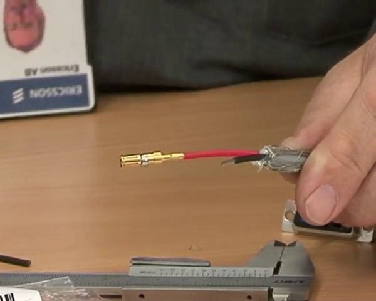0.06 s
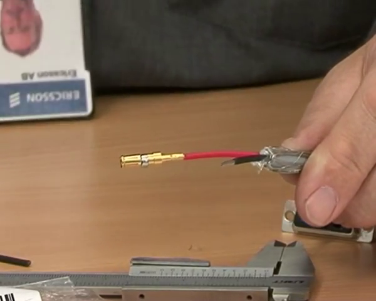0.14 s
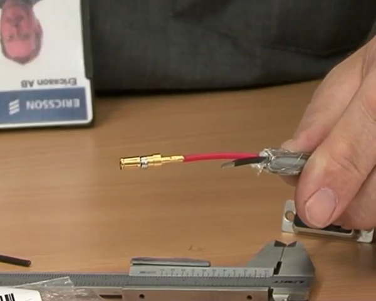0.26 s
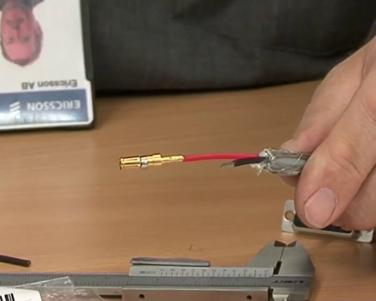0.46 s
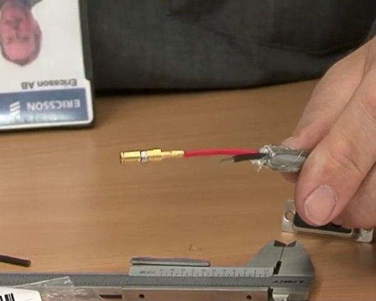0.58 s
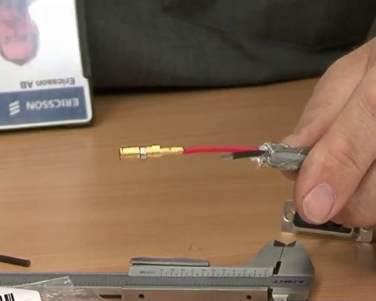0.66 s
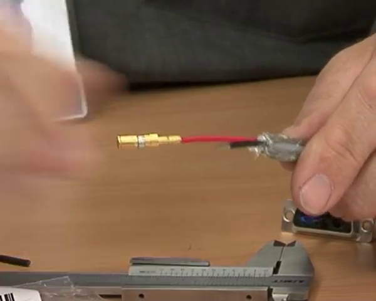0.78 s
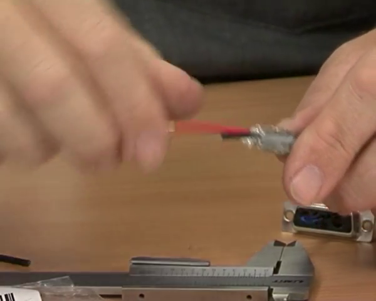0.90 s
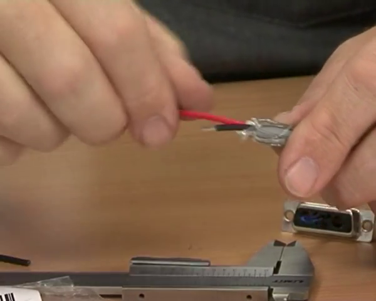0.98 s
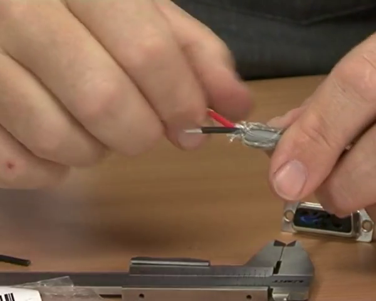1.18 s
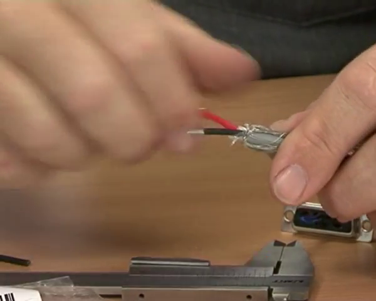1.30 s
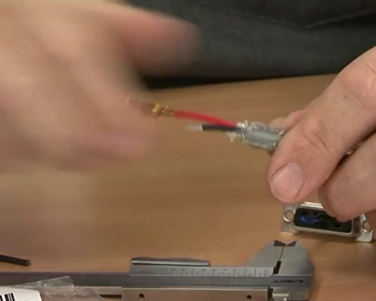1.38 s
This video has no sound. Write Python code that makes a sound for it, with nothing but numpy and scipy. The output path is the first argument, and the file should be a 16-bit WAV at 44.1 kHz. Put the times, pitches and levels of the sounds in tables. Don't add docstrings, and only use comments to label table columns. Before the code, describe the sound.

A steel hand tool knocks down on a wooden table, bounces, knocks again, then plastic rubbing

```python
import sys
import numpy as np
from scipy import signal
from scipy.io import wavfile

SR = 44100
rng = np.random.default_rng(int(sys.argv[2]) if len(sys.argv) > 2 else 0)


def store_pcm(level_fs):
    pcm = np.round(np.clip(level_fs, -1, 1) * 32767).astype(np.int16)
    wavfile.write(sys.argv[1], SR, np.atleast_2d(pcm).T)


def how_loud(loudness_db):
    steps = np.asarray(loudness_db, float) / 20
    return 10 ** steps


N = 63945
T = np.arange(N) / SR


def rms_one(x):
    return x / np.sqrt(np.mean(x ** 2) + 1e-20)


def in_time(rows, column=1):
    rows = np.array(rows)
    return how_loud(np.interp(T, rows[:, 0], rows[:, column], right=-99))


def at_hz(points, hz):
    points = np.array(points)
    return np.interp(np.log(hz), np.log(points[:, 0]), points[:, 1])


def drift(rate_hz):
    r = np.exp(-2 * np.pi * rate_hz / SR)
    white = rng.standard_normal(N + SR)
    return rms_one(signal.lfilter([1], [1, -2 * r, r * r], white)[SR:])


def ring(clicks, hz, t60_s):
    r, w = how_loud(-60 / (t60_s * SR)), 2 * np.pi * hz / SR
    return signal.lfilter([0, np.sin(w)], [1, -2 * r * np.cos(w), r * r], clicks + 1e-18)


def click(s, db):
    out = np.zeros(N)
    out[min(int(s * SR), N - 1)] = how_loud(db)
    return out


def butter(x, order, hz, kind):
    return signal.sosfilt(signal.butter(order, hz, kind, fs=SR, output="sos"), x)


def soft(x, hz):
    return butter(x, 2, hz, "low")


def bands(length):
    edges = 22 * 2 ** np.arange(0, 9.3, 1 / 3)
    white = rng.standard_normal((2, length + 8000))
    out = []
    for k, (low, high) in enumerate(zip(edges, edges[1:])):
        noise = butter(white[k % 2], 2, [low, high], "band")[8000:]
        out.append((np.sqrt(low * high), noise))
    return out


def grains(per_s, spread_db):
    size = how_loud(spread_db * np.minimum(rng.exponential(1, N), 4)) * rng.choice([-1, 1], N)
    return size * (rng.random(N) < per_s / SR)


# start in seconds, level in dB, crack in dB, crack length in seconds, table thump in dB.
BLOWS = [
    (0.2388, -6, -40, 0.0013, -16),
    (0.2801, -6.5, -24.5, 0.00062, -24),
    (0.5112, -3, -29, 0.0014, -19),
]
# frequency in Hz, level in dB, t60 in seconds.
FIRST_MODES = [(433.6, 3.5, 0.061), (589, -5, 0.062), (138, -7, 0.033), (823, -7, 0.038),
               (1300, -24, 0.018)]
BOUNCE_MODES = [(771, 1.5, 0.037), (309.3, -6, 0.1), (438, -14, 0.094), (1278, -5, 0.024),
                (1813, -10, 0.039), (2382, -4.5, 0.0097), (622, -9, 0.034)]
SECOND_MODES = [(814, 0, 0.032), (331, -5.5, 0.048), (1643, -11, 0.025), (1232, -12.5, 0.036),
                (2430, -21, 0.016), (946, -8.5, 0.018)]


def knocks():
    out = np.zeros(N)
    for (s, db, crack_db, crack_s, _), modes in zip(BLOWS, (FIRST_MODES, BOUNCE_MODES, SECOND_MODES)):
        tones = np.zeros(N)
        for k, (hz, mode_db, t60_s) in enumerate(modes):
            tones += (-1) ** (k + 1) * ring(click(s, db + mode_db), hz, t60_s)
        u = np.maximum(T - s, 0) / crack_s
        out += soft(tones, 4900) + how_loud(crack_db) * rng.standard_normal(N) * u * np.exp(1 - u)
    return out


# frequency in Hz, level in dB, t60 in seconds.
TABLE_MODES = [(74, -5, 0.038), (96.2, -3, 0.22), (142.6, -3.5, 0.16), (163.5, -7, 0.45),
               (217.9, -3.5, 0.42), (255.4, -4, 0.55)]


def table_thumps():
    legs_hz, legs_lag_s, legs_t60_s, legs_db = 56.8, 0.029, 0.21, -9.5
    out = np.zeros(N)
    for s, _, _, _, thump_db in BLOWS:
        out += soft(sum(ring(click(s, thump_db + db), hz, t60_s) for hz, db, t60_s in TABLE_MODES), 190)
        u = np.maximum(T - s - legs_lag_s, 0)
        swell = u / legs_t60_s * 20 * how_loud(-60 * u / legs_t60_s)
        out += how_loud(thump_db + legs_db) * np.sin(2 * np.pi * legs_hz * u) * swell
    return out


# frequency in Hz, level in dB, t60 in seconds.
PANEL_MODES = [(331.2, -10.5, 0.26), (398.4, -8, 0.33), (500, -10, 0.37), (646, -11, 0.31),
               (735, -19, 0.38), (797, -16.5, 0.45), (970, -13, 0.35), (1061, -17.5, 0.5)]
PANEL_DRIVE_DB = [-25, -23, -17.5]


def panel_ringing():
    out = np.zeros(N)
    for (s, *_), drive_db in zip(BLOWS, PANEL_DRIVE_DB):
        for k, (hz, db, t60_s) in enumerate(PANEL_MODES):
            out += (-1) ** k * ring(click(s, drive_db + db), hz, t60_s)
    return out


# level in dB, rise in seconds, t60 in seconds, top frequency in Hz.
RATTLES = [
    (-24.5, 0.0087, 0.3, 1720),
    (-27.5, 0.00067, 0.19, 2420),
    (-22.5, 0.005, 0.33, 1170),
]


def rattles():
    bright_db, ring_db = -29, -14.5
    out = np.zeros(N)
    for (s, *_), (db, rise_s, t60_s, top_hz) in zip(BLOWS, RATTLES):
        taps = butter(grains(6000, 3.05), 1, 250, "high")
        loose = rms_one(soft(taps, top_hz))
        loose += how_loud(bright_db) * rms_one(soft(taps, 8600))
        loose += how_loud(ring_db) * rms_one(ring(taps, 2000, 0.0095))
        u = np.maximum(T - s, 0)
        out += how_loud(db - 60 * u / t60_s) * (1 - np.exp(-u / rise_s)) * loose
    return out


# start in seconds, level in dB, tilt in dB per octave.
JINGLES = [(0.254, -39, -1), (.265, -38.5, -1), (0.283, -35.5, -13), (0.297, -38, -16), (0.308, -44, -10),
           (.521, -43, -5), (0.533, -37, -8), (.541, -41, -3), (0.566, -45, -9), (.576, -46.5, -8)]
# frequency in Hz, level in dB, t60 in seconds.
STEEL_MODES = [(6854, 0, .27), (6826, -5, .25), (10240, -5, .26), (10290, -11, .12), (5346, -10, .32),
               (5390, -12, .25), (6345, -5, .1), (6400, -10, .08), (9600, -10, .05), (7050, -10, .06),
               (6620, -9, .06)]


def handles():
    touch_s, wobble_db, wobble_hz = .004, 1.5, 70
    out = np.zeros(N)
    ends = [row[0] for row in JINGLES[1:]] + [2]
    for (s, db, tilt_db), end in zip(JINGLES, ends):
        gate = np.clip((T - s) / touch_s, 0, 1) * np.clip((end - T) / touch_s + 1, 0, 1)
        for hz, mode_db, t60_s in STEEL_MODES:
            level_db = db + mode_db + tilt_db * np.log2(hz / 6850)
            out += gate * ring(click(s, level_db), hz, t60_s)
    return out * how_loud(wobble_db * drift(wobble_hz))


# time in seconds, pressure as level in dB, brightness in dB.
STROKES = [(.80, -83, -10), (.83, -48, -18), (.90, -64, -15), (.96, -54.5, -8), (1.015, -41, -21),
           (1.04, -39.5, -19), (1.06, -37, -9.5), (1.11, -40.5, -11.5), (1.14, -39, -19), (1.195, -41, -30),
           (1.21, -74, -10), (1.30, -60, 0), (1.338, -57, -2), (1.346, -36.5, -22), (1.358, -41.5, -10),
           (1.37, -39, -13), (1.40, -36.5, -13), (1.45, -43.5, -10.5)]
# frequency in Hz, width in Hz, level in dB.
PLASTIC_BODY = [(463, 90, -8), (756, 110, -5.5), (1250, 130, -2), (1780, 170, -6), (2200, 340, -12),
                (3150, 300, -10), (3550, 260, -12), (4440, 310, -20)]
# frequency in Hz, width in Hz, level in dB.
PLASTIC_HISS = [(5360, 380, 3.5), (6600, 980, 0.5), (7620, 500, -0.5), (10400, 2600, -3.5)]


def resonate(slips, resonances):
    patch_db, patch_hz = 1.5, 50
    out = np.zeros(N)
    for k, (hz, width_hz, db) in enumerate(resonances):
        tone = ring(slips, hz, 2.6 / width_hz) * width_hz / 100
        out += (-1) ** k * how_loud(db + patch_db * drift(patch_hz)) * tone
    return rms_one(out)


def rubbing():
    level_db, broad_db, start_s, fade_s = 0.5, -33, .78, 0.014
    slips = grains(2500, 2.0) * how_loud(drift(68))
    broad = rms_one(butter(slips, 1, [300, 3500], "band"))
    body = rms_one(resonate(slips, PLASTIC_BODY) + how_loud(broad_db) * broad)
    hiss = in_time(STROKES, column=2) * resonate(slips, PLASTIC_HISS)
    gate = np.clip((T - start_s) / fade_s, 0, 1)
    return how_loud(level_db) * gate * in_time(STROKES) * (body + hiss)


# time in seconds, level in dB.
DRAG = [
    (0.0, -46.5),
    (0.266, -28),
    (0.422, -41.5),
    (0.5, -47),
]


def drag():
    level_db, ring_db = -3, -14
    rumble = butter(grains(500, 2.9), 2, [167, 524], "band")
    tool = rms_one(ring(rumble, 462, 0.04))
    return how_loud(level_db) * in_time(DRAG) * rms_one(rms_one(rumble) + how_loud(ring_db) * tool)


# start in seconds, level in dB, frequency in Hz, t60 in seconds.
BUMPS = [(.012, -24, 143.6, 0.073), (0.013, -24, 410, 0.036), (.085, -25, 326, 0.019),
         (0.206, -30, 400, 0.058), (.218, -37, 412, .05), (.2407, -6, 420, 0.026), (.261, -8, 459, 0.062),
         (0.2856, -6, 500, 0.013), (0.407, -36, 91.5, 0.11), (.428, -39, 58.5, 0.11), (.29, -17, 173, 0.06),
         (1.352, -33.5, 278, 0.087), (1.38, -38, 250, 0.057), (0.3, -14.5, 354, 0.042),
         (0.323, -20, 343.4, 0.071), (0.443, -28.5, 337, 0.052), (0.5076, -13, 159, 0.082),
         (1.443, -24, 326, 0.033)]


def bumps():
    return -sum(soft(ring(click(s, db), hz, t60_s), 1740) for s, db, hz, t60_s in BUMPS)


# start in seconds, level in dB, frequency in Hz.
SNAPS = [(.2805, -26, 5800), (.2804, -29, 4300), (.2804, -29, 7800), (.2804, -28, 9200),
         (.2804, -29, 10500), (.2803, -19, 2600), (.2822, -16.5, 1800), (.5120, -17.5, 4020),
         (.5120, -19, 5600), (.5122, -29, 7000), (.5122, -30, 8800), (.5122, -24, 11300)]
# start in seconds, level in dB, frequency in Hz.
TICKS = [
    (0.531, -35, 8000),
    (0.828, -36, 2000),
    (.837, -38, 1300),
    (1.347, -31.5, 1170),
    (1.347, -34, 2230),
    (1.364, -20.5, 1740),
]
# start in seconds, level in dB, frequency in Hz.
FAINT_TICKS = [(.2385, -36, 2900), (.245, -34, 3400), (.2465, -27, 1920), (.249, -37, 5300),
               (.256, -35, 3300), (.262, -37, 4300), (.300, -36, 5350), (.396, -46, 4600),
               (.411, -42, 5600), (.4675, -30, 1250), (.4675, -38, 2200), (.4675, -36, 750),
               (.4678, -45, 4200), (.472, -41, 3200), (.474, -36, 1300), (.478, -45, 3300),
               (.485, -38, 3000), (.488, -40, 1200), (.493, -41, 2600), (.497, -41, 1900),
               (.857, -46, 4000), (.868, -48, 5700), (.878, -49, 6000)]
# start in seconds, level in dB, frequency in Hz.
CATCHES = [(1.005, -39, 2110), (1.082, -37, 3240), (1.088, -32, 1760), (1.108, -41, 3120),
           (1.132, -41, 3230), (1.152, -38, 1830), (1.156, -31.5, 3360), (1.172, -41, 1270),
           (1.186, -32, 1240), (1.188, -40, 3500), (1.347, -38, 3150), (1.364, -37, 3550),
           (1.378, -32, 3300), (1.39, -30, 1840), (1.395, -39, 3200), (1.41, -31, 1860), (1.414, -35, 3500),
           (1.435, -32, 1300), (1.436, -36, 3230)]


def ticks():
    return sum(ring(click(s, db), hz, 30 / hz) for s, db, hz in TICKS + SNAPS + FAINT_TICKS + CATCHES)


def squeak():
    start_s, length_s, start_hz, rise_hz_per_s, level_db = 1.215, .1, 7700, 13500, -65
    u = np.clip(T - start_s, 0, length_s)
    tone = np.sin(2 * np.pi * (start_hz * u + rise_hz_per_s * u ** 2 / 2))
    return how_loud(level_db + 3.4 * drift(40)) * np.sin(np.pi * u / length_s) * tone


# frequency in Hz, t60 in seconds.
ROOM_T60 = [(60, 0.23), (250, 0.37), (1000, 0.4), (3000, 0.093), (10000, 0.3)]
# frequency in Hz, level in dB.
ROOM_COLOUR = [(55, 6), (100, -3.5), (300, -3.5), (1000, -7.5), (2500, 1.5), (6000, -2), (11000, -6)]


def room(x):
    level_db, build_s = -14, 0.012
    t = np.arange(SR // 2) / SR
    tail = np.zeros(len(t))
    for hz, noise in bands(len(t)):
        tail += how_loud(at_hz(ROOM_COLOUR, hz) - 60 * t / at_hz(ROOM_T60, hz)) * noise
    tail *= 1 - np.exp(-(t / build_s) ** 2)
    return how_loud(level_db) * signal.fftconvolve(x, tail / np.sqrt(np.sum(tail ** 2)))[:N]


# frequency in Hz, density in dB per Hz.
AIR = [(22, 5), (60, -1), (190, 1.5), (700, -8), (1500, -9.5), (2500, -21.5), (5000, -27.5), (12500, -30)]


def air():
    level_db, patchy_db = -42, 2
    noise = sum(how_loud(at_hz(AIR, hz) + patchy_db * drift(7.1)) * band for hz, band in bands(N))
    return how_loud(level_db) * rms_one(noise)


def scene():
    near = knocks() + bumps() + ticks() + squeak() + rubbing()
    steel = handles()
    table = table_thumps() + panel_ringing() + rattles()
    wet = room(near + how_loud(-9.5) * steel)
    return (near + steel + wet + table + drag() + air())[None, :]


def low_pass(x):
    return signal.sosfilt(signal.butter(12, 12510, fs=SR, output="sos"), x)


def record(dry):
    bass_cut_hz, peak, top_cut_hz = 47, .94, 11950
    x = butter(dry, 3, bass_cut_hz, "high")
    x = x / (1 + (np.abs(x) / peak) ** 6) ** (1 / 6)
    x = signal.sosfilt(signal.ellip(12, .5, 60, top_cut_hz, fs=SR, output="sos"), x)
    return low_pass(x)


dry = scene()
out = record(dry)
store_pcm(out)
```